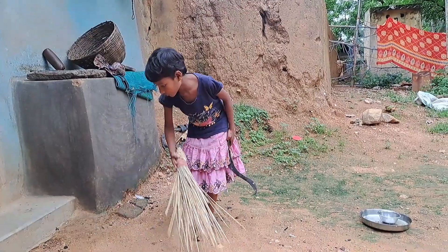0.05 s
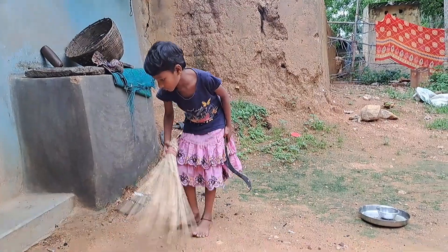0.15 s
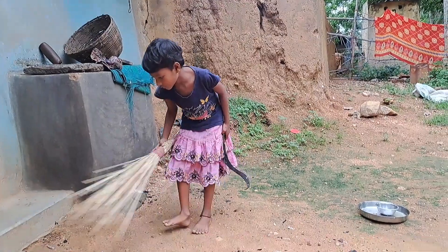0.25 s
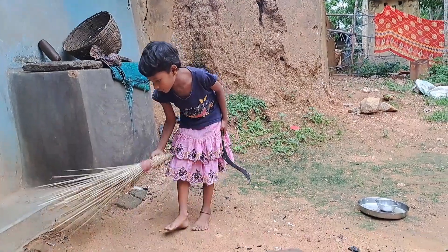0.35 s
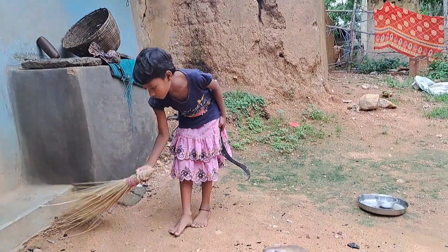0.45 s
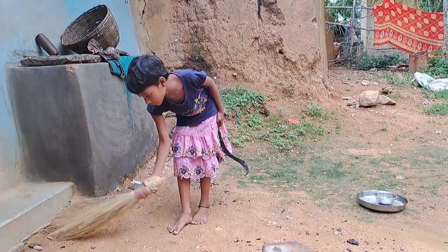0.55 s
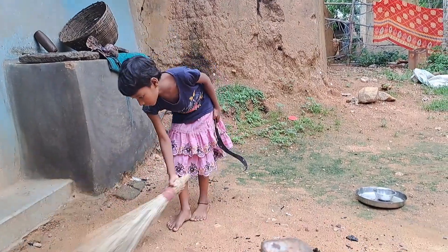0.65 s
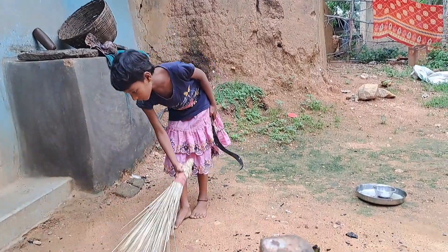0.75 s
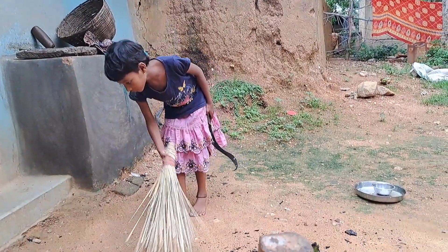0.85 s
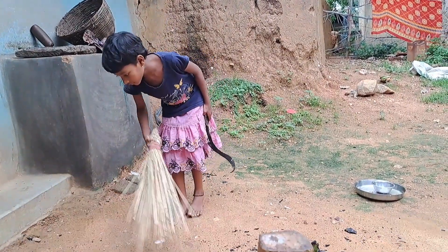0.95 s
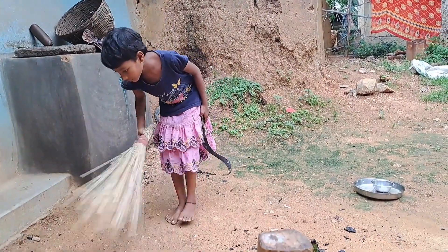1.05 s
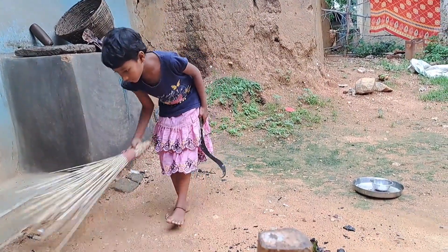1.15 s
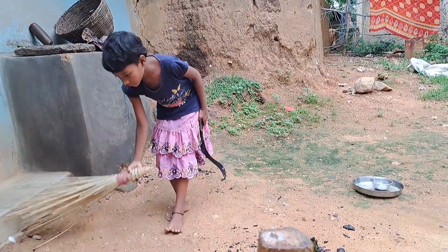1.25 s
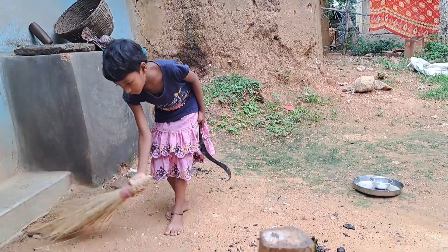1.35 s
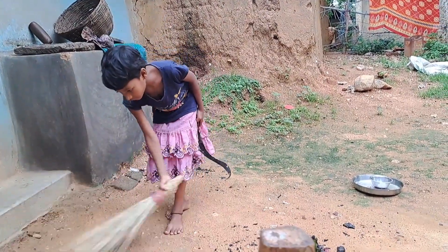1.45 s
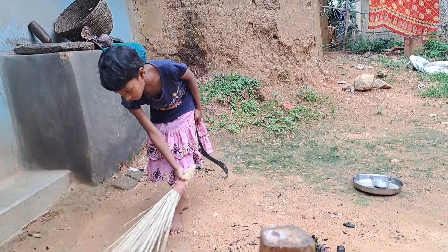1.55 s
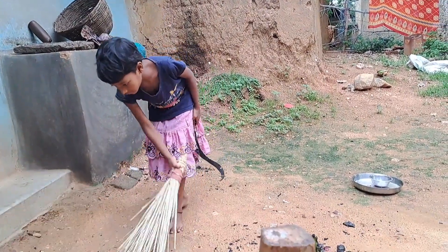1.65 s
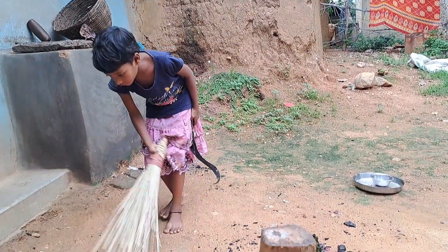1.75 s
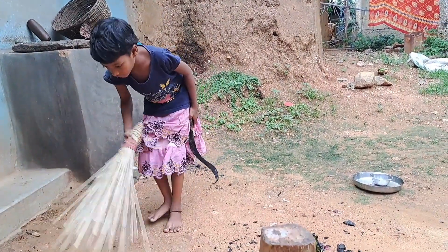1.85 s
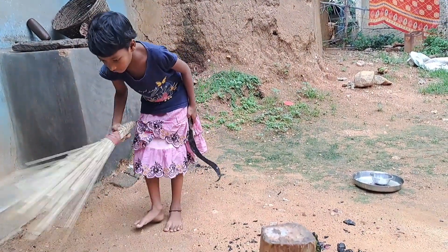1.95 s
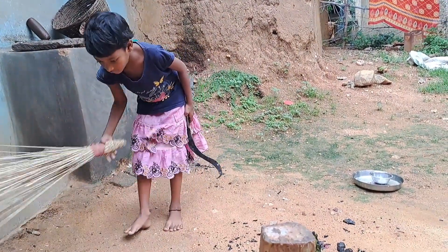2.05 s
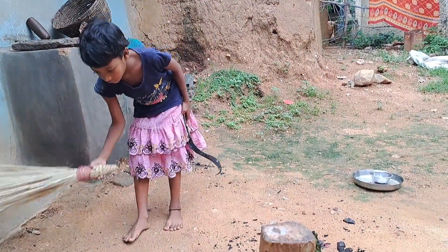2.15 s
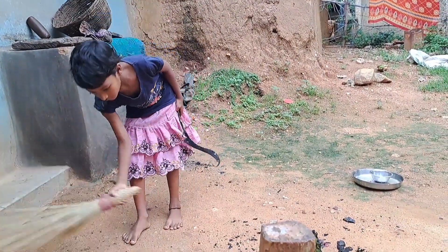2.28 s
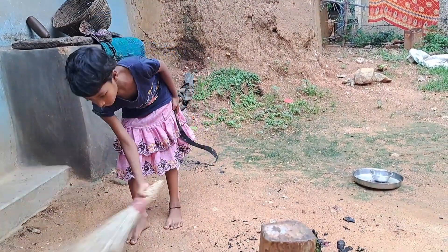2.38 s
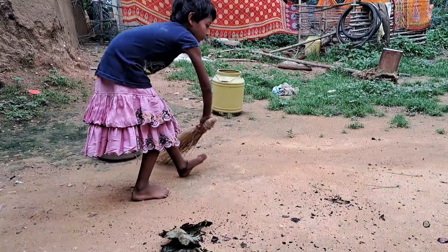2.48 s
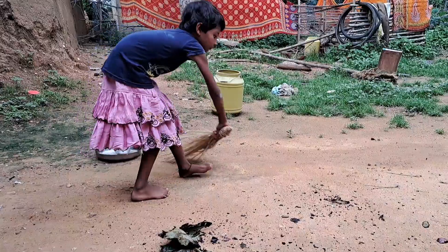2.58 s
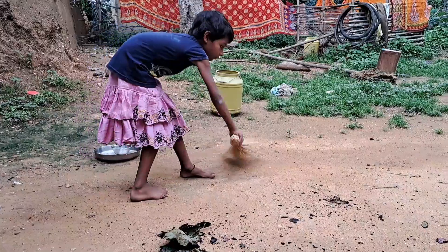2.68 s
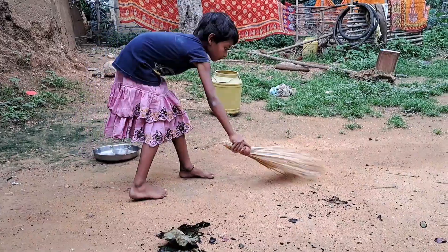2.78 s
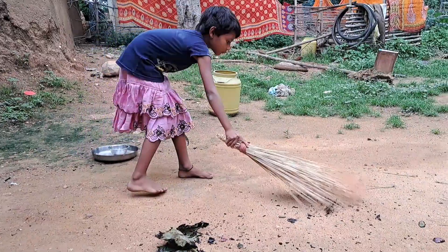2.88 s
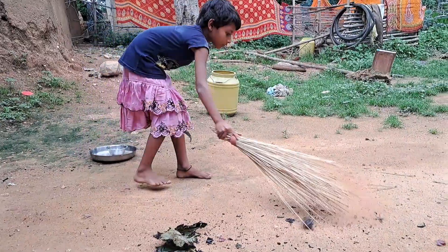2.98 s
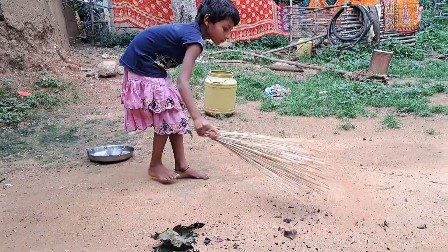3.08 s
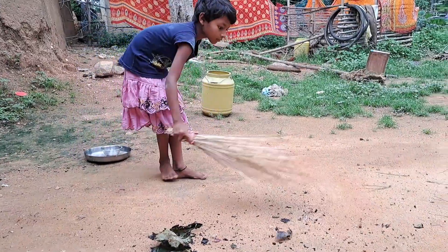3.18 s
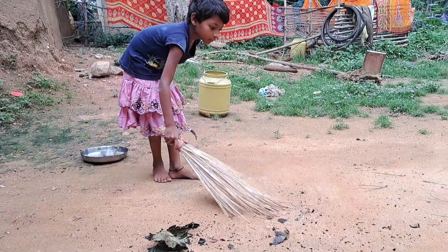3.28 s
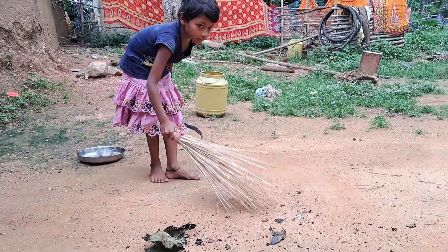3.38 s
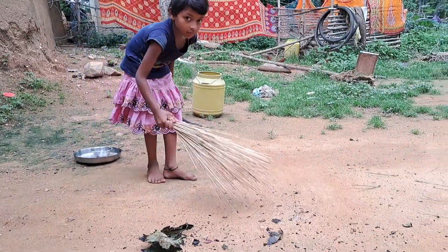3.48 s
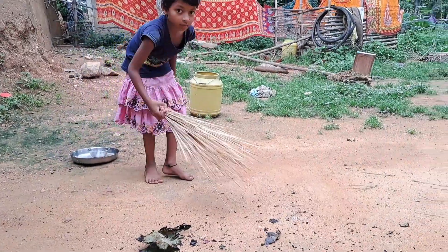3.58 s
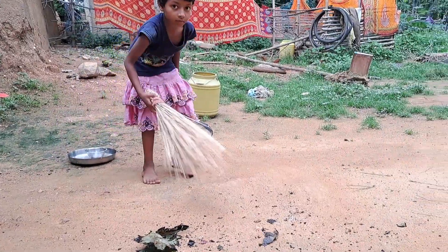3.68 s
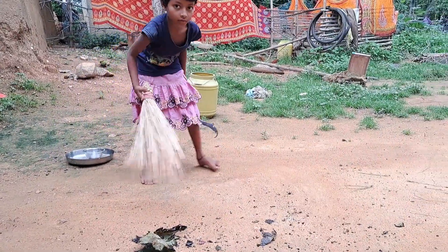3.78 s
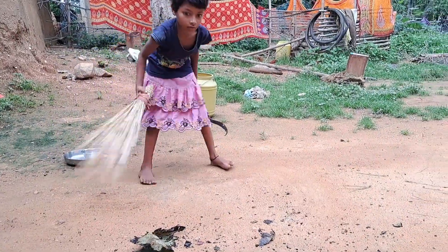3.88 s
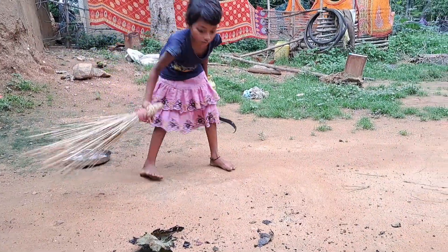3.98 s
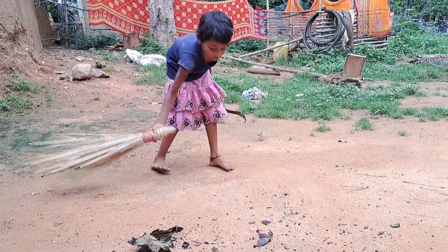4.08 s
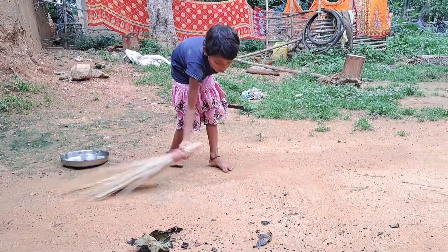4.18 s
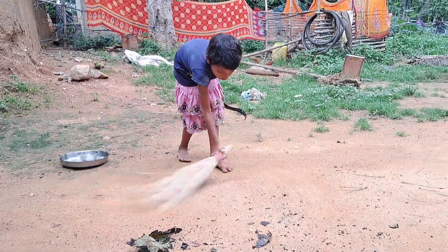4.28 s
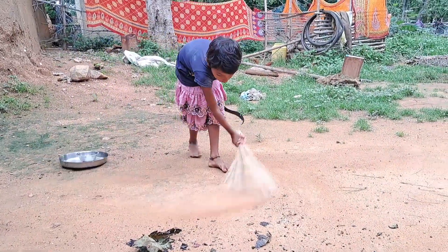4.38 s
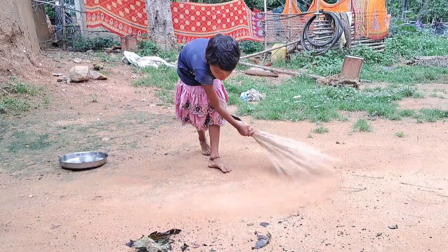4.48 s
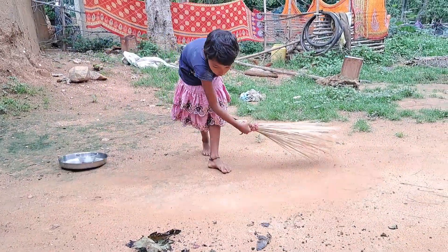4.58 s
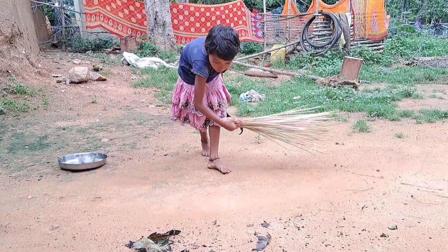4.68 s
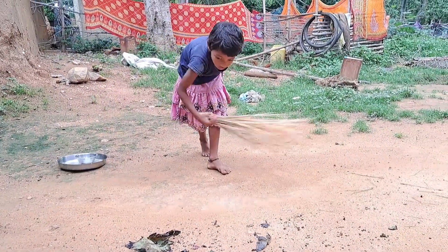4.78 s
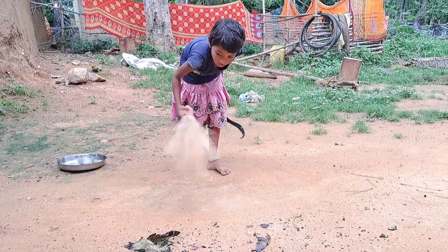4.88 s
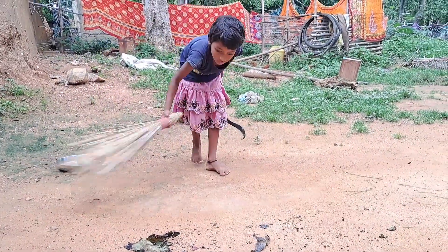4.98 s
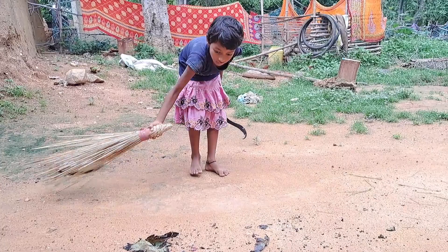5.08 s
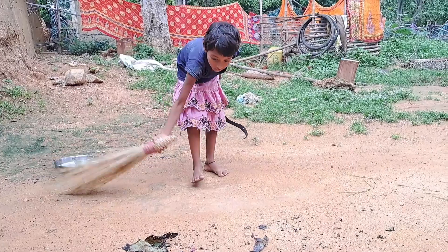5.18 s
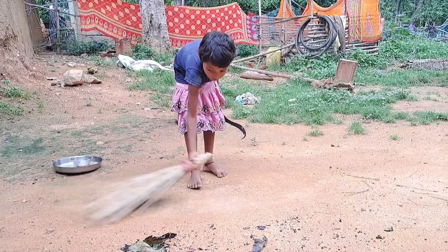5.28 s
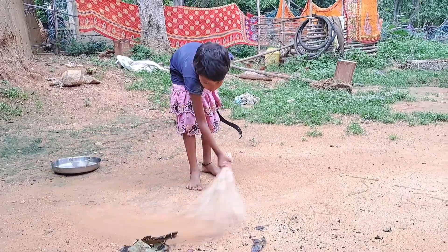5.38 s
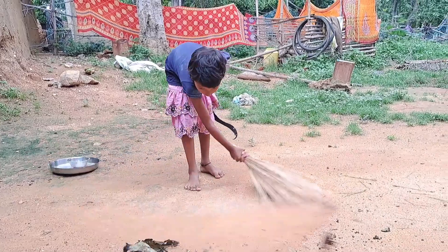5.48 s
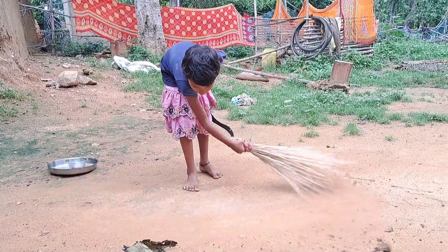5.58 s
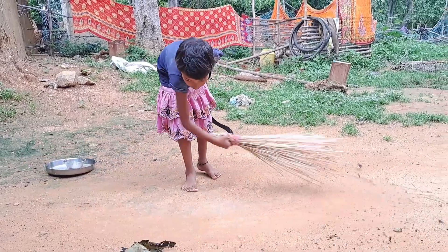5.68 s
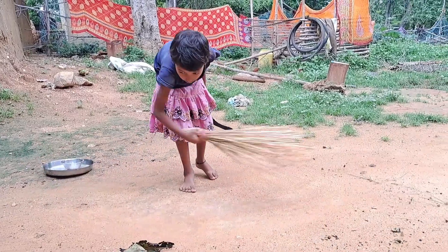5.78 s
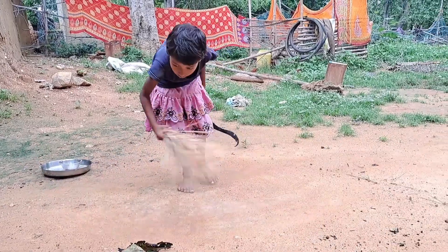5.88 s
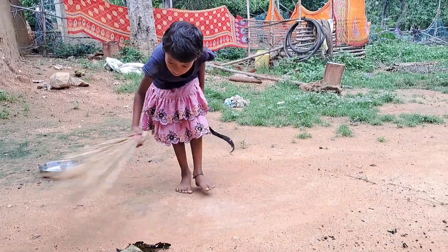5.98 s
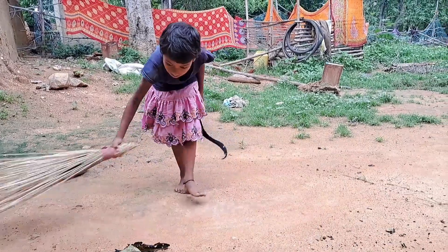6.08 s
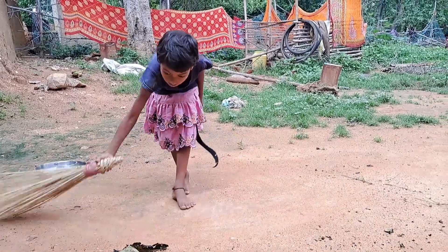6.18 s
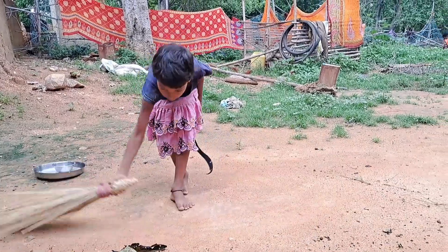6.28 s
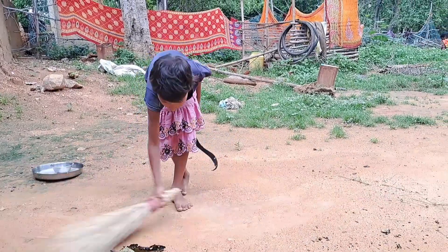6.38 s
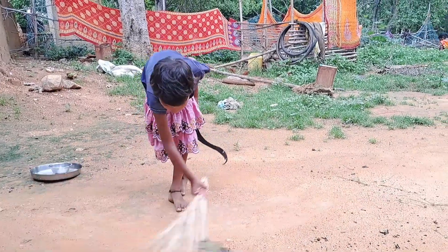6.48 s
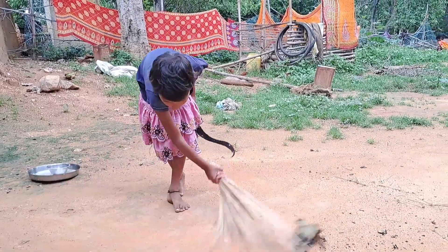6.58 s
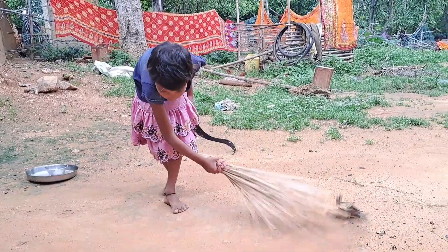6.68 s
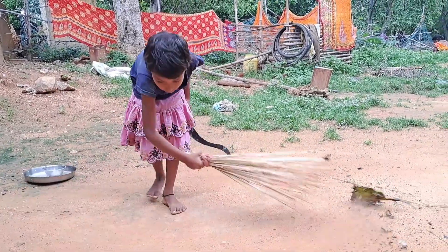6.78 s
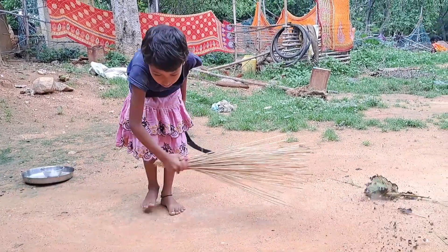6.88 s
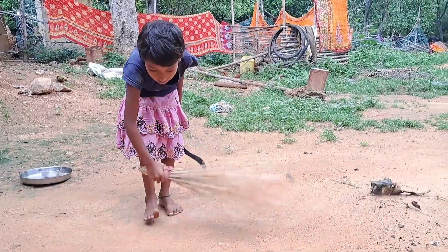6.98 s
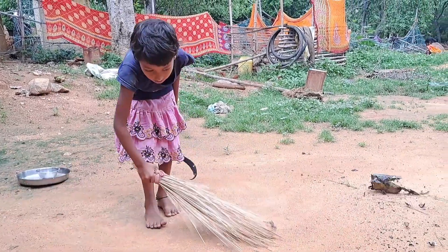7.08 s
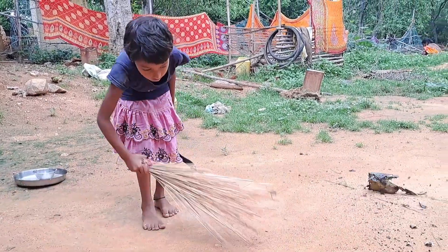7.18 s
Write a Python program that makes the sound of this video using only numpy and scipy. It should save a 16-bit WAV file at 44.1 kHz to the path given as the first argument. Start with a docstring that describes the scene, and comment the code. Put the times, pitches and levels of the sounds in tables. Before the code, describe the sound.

A stiff grass broom sweeps bare dirt in steady gritty swishes, with stalk ticks, one sharp bright click, and a clod tumbling near the end.

```python
"""A grass hand broom starts sweeping bare dirt beside a wall, stalks hissing and scratching over grit.
Single stalks tick and clods knock; from about 2 s a few faint far notes whistle or hiss.
Near 2.5 s the sound drops out briefly, then the strokes go on over open ground; late on, a swept clod tumbles.
Shaped noise makes the sweep, knocks, far rumble, wavering hum and air; smeared sines make the notes.
Two microphone ports hear it all, the left slightly earlier and the right louder."""
import sys
import numpy as np
from scipy import signal
from scipy.fft import rfft, irfft, next_fast_len
from scipy.io import wavfile
from scipy.ndimage import uniform_filter1d, map_coordinates

SR = 44100
rng = np.random.default_rng(int(sys.argv[2]) if len(sys.argv) > 2 else 0)


def materialize(psi):
    """Save the field psi as 16-bit PCM at rate SR to the path in sys.argv[1].

    A 1-D psi becomes a single channel; in a 2-D psi each row is a channel.
    """
    bounded = np.clip(np.atleast_2d(psi).T, -1, 1)
    quanta = np.round(bounded * 32767).astype(np.int16)
    wavfile.write(sys.argv[1], SR, quanta)


N = 319351  # samples


def amp(db):
    """Decibels to linear gain."""
    return 10 ** (np.asarray(db) / 20)


def unit(x):
    """Scale to an rms of 1."""
    return x / np.sqrt(np.mean(x ** 2) + 1e-20)


def along(points, hz):
    """Read (f/Hz, value) points along a log frequency axis."""
    f, v = np.transpose(points)
    return np.interp(np.log(hz + 1), np.log(f + 1), v)


def curves(rows):
    """Draw one automation curve for each column after the time."""
    s, *cols = np.transpose(rows)
    return [np.interp(np.arange(N) / SR, s, c) for c in cols]


def wobble(rate):
    """A smooth random curve with rate knots a second, fixed or one value per sample."""
    knots = np.cumsum(rate * np.ones(N)) / SR
    return map_coordinates(rng.standard_normal(N // 8), [knots], mode="wrap")


def filtered(x, response):
    """Shape the spectrum of x with a response of frequency."""
    m = next_fast_len(N + 8192)
    spectrum = rfft(x, m) * response(np.fft.rfftfreq(m, 1 / SR))
    return irfft(spectrum, m)[..., :N]


# How alike left and right sound: f/Hz, likeness (1 = the same)
LIKENESS = [(60, 0.71), (300, 0.92), (640, 0.24), (1200, 0.62), (2400, 0.067), (5000, 0.073), (12000, 0.04)]


def part(source, gain):
    """Colour two unrelated signals and mix them so the ports agree mostly in the bass; rms 1."""
    def mid_side(hz):
        turn = np.arccos(np.clip(along(LIKENESS, hz), -1, 1)) / 2
        return gain(hz) * np.array([np.cos(turn), np.sin(turn)])

    mid, side = filtered(source, mid_side)
    return unit(np.array([mid + side, mid - side]))


def noise_part(gain):
    """White noise shaped into a stereo layer."""
    return part(rng.standard_normal((2, N)), gain)


def effort():
    """How hard the broom is working, 0 to 1, from its smoothed pressure."""
    hiss_db = uniform_filter1d(curves(np.vstack(PRESSURE))[0], size=4000)
    return np.clip(1 + (hiss_db - FULL_DB) / 25, 0, 1)


# Yard between strokes, before swells: t/s, rumble level/dB, hum level/dB
YARD_LEVELS = [(0, -68.5, -76), (.9, -61.5, -70), (1.25, -64, -69), (1.5, -71.5, -84), (2.45, -69, -80),
               (3.1, -67.5, -70.5), (4.8, -70.5, -75), (6, -68, -73), (7.24, -65, -74.5)]
# Relative rumble spectrum: f/Hz, level/dB per Hz
RUMBLE_COLOUR = [(12, -38.5), (20, -2), (70, -2), (92, -4.5), (133, -7), (161, -8.5), (232, -1.5),
                 (281, -9.5), (900, -37.5), (1170, -70), (1980, -120)]
RUMBLE_SWELL_DB = 2  # at full pressure


def rumble():
    """Far rumble: deep coloured noise that wavers and swells with the strokes."""
    rumble_db, _ = curves(YARD_LEVELS)
    level_db = rumble_db + RUMBLE_SWELL_DB * effort() + 0.8 * wobble(4.3)
    return amp(level_db) * noise_part(lambda hz: amp(along(RUMBLE_COLOUR, hz)))


# Hum resonance: centre f/Hz, half width f/Hz (where the gain halves)
HUM_BAND = (128.6, 5)
HUM_SWELL_DB = 7.5  # at full pressure


def hum():
    """Wavering hum: noise in so narrow a resonance that it beats, swelling with the strokes."""
    centre, width = HUM_BAND
    _, hum_db = curves(YARD_LEVELS)
    band = noise_part(lambda hz: 1 / (1 + ((hz - centre) / width) ** 2))
    return amp(hum_db + HUM_SWELL_DB * effort()) * band


# Relative spectrum of far leaves and insects: f/Hz, level/dB per Hz
AIR_COLOUR = [(530, 1), (900, 1), (1520, -15), (2050, -21), (2130, -2.5), (2980, -19.5), (7300, 3),
              (9500, -12.5), (15700, 0)]
AIR_DB = -70.5  # mean level, before the waver


def air():
    """Far leaves and insects: a smooth, gently wavering coloured hiss."""
    return amp(AIR_DB + 0.69 * wobble(7.4)) * noise_part(lambda hz: amp(along(AIR_COLOUR, hz)))


# Far notes, the widest only a faint band of hiss:
# t/s, length/s, first f/Hz, held f/Hz, nominal level/dB, blur f/Hz, share of the note spent gliding
BIRD_NOTES = [(1.986, 0.041, 1360, 1400, -56, 60.5, .5), (3.39, 0.16, 4590, 5300, -49.5, 181, .55),
              (3.628, 0.44, 2320, 2320, -67.5, 600, 0.54), (4.016, 0.173, 2300, 2320, -57.5, 88.9, 1)]
SWELL, NOTE_EDGE_DB = 0.26, -12.5  # share of a note spent swelling; level at its ends


def bird(s, length, first_hz, held_hz, db, blur_hz, glide):
    """A soft far whistle glides to a held note; leaves and echoes smear it into a narrow band of noise."""
    u = (np.arange(N) / SR - s) / length  # 0 to 1 through the note
    bend = np.sin(np.pi / 2 * np.clip(u / glide, 0, 1)) ** 2
    hz = first_hz + (held_hz - first_hz) * bend
    swell = amp(db + np.interp(u, [0, SWELL, 1], [NOTE_EDGE_DB, 0, NOTE_EDGE_DB]))
    smear = 20 / blur_hz + wobble(blur_hz) + 1j * wobble(blur_hz)
    sounding = uniform_filter1d(1. * ((u > 0) & (u < 1)), size=500)
    whistle = np.real(np.exp(2j * np.pi * np.cumsum(hz) / SR) * smear)
    return sounding * swell * whistle


def taps(rows, width, rise, t60):
    """Short decaying noise bursts ring around each centre; width is a share of it, rise and t60 in s."""
    length = 4096
    out, t = np.zeros((2, N + length)), np.arange(length) / SR
    hz = np.fft.rfftfreq(length, 1 / SR)
    shape = (1 - np.exp(-t / rise)) * amp(-60 * t / t60)
    for s, db, centre in rows:
        damping = 1j * hz * centre * width
        ring = damping / (centre ** 2 - hz ** 2 + damping)
        # one noise common to both sides, plus one of its own for each
        noise = rng.standard_normal(length) + 0.6 * rng.standard_normal((2, length))
        burst = irfft(rfft(noise * shape) * ring ** 2)
        peak = np.sqrt(uniform_filter1d(np.mean(burst ** 2, axis=0), size=40).max())
        start = round(s * SR)
        out[:, start:start + length] += amp(db) * burst / peak
    return out[:, :N]


# The swept clod rolls and sheds crumbs: from t/s, to t/s, highest peak level/dB, middle f/Hz
TUMBLE_SPAN = (6.65, 7.2, -48, 902)
CRUMBS = 160


def crumbs():
    """Many small knocks at random times, levels and pitches while the clod rolls."""
    start, end, db, hz = TUMBLE_SPAN
    when, size, pitch = rng.random((CRUMBS, 3)).T
    return np.c_[start + (end - start) * when, db - 10 * size, hz * 4 ** (pitch - .5)]


# Clods and pebbles knock on the ground: t/s, peak level/dB, centre f/Hz
CLOD_KNOCKS = [(0.228, -46.5, 316), (0.524, -44, 684), (0.787, -43, 282), (2.424, -44, 308),
               (6.123, -59, 290), (6.521, -26.5, 1370), (6.583, -31, 1720), (6.697, -30.5, 1110),
               (6.771, -29.5, 1500), (6.834, -39.5, 1300), (6.913, -35.5, 600), (6.942, -40, 444),
               (6.974, -60, 400), (7.011, -44, 1000), (7.077, -39, 1020), (7.133, -40, 1290)]


def clods():
    """Clods, pebbles and shed crumbs knock on the dirt as short, damped bursts."""
    return taps([*CLOD_KNOCKS, *crumbs()], width=1.1, rise=.0005, t60=0.011)


# Single stalks snap back: t/s, peak level/dB, centre f/Hz
STALK_TICKS = [(0.16, -36, 4860), (0.3516, -42.5, 14000), (0.379, -51, 6190), (0.421, -51, 7060),
               (1.203, -50, 6000), (1.3057, -62, 6750), (1.3194, -42, 5300), (1.8652, -38, 5800),
               (2.198, -65, 6000), (2.5331, -47, 11500), (2.5535, -38, 12200), (2.6184, -34, 14500),
               (2.8453, -20.5, 14500), (3.0752, -32, 7160), (3.2, -47, 5260), (3.2779, -52, 5740),
               (3.337, -44, 12000), (3.373, -33, 13000), (4.202, -48, 7000), (5.183, -47.5, 8550),
               (5.238, -45, 7750), (6.088, -51, 7800)]


def ticks():
    """Single stalks snap back with short, mostly bright bursts."""
    return taps(STALK_TICKS, width=1.1, rise=.0004, t60=0.014)


def grit(spiky_db, patchy_db, size):
    """Dense scratches of uneven strength, size samples long, in patches where bunches of stalks catch."""
    strength = np.minimum(rng.exponential(size=N // size + 1), 4)
    strength = uniform_filter1d(np.repeat(strength, size)[:N], size=size)
    scratches = amp(spiky_db * strength) * rng.standard_normal((2, N))
    z = signal.stft(scratches, nperseg=256)[2]
    patches = uniform_filter1d(rng.standard_normal(z.shape[1:]), size=4, axis=0)  # smooth over frequency
    patches = uniform_filter1d(patches, size=9, axis=1)  # smooth over time
    return signal.istft(z * amp(patchy_db * unit(patches)), nperseg=256)[1][:, :N]


# Relative sweep spectra beside the wall and on open ground: f/Hz, level/dB per Hz
WALL_SWEEP = [(88, -53.5), (150, -29.5), (405, -27.5), (881, -17.5), (1230, -7), (1680, -3.5), (1850, -6),
              (2160, -2.5), (2780, -3), (5490, 4.5), (8760, -3), (12000, 2.5), (15700, 4.5)]
OPEN_SWEEP = [(88, -42), (150, -18.5), (302, -11.5), (473, -19.5), (521, -14), (1710, 4), (2570, -2),
              (5180, -2), (6290, -7), (7790, -2.5), (9650, -8), (12400, 0), (15700, -1)]
# How hard the broom bears on the ground, one list from each touchdown: t/s, hiss level/dB
PRESSURE = [
    [(0.0, -39.5), (0.154, -51), (0.16, -47), (0.21, -55.5), (0.356, -65.5), (0.372, -75), (0.378, -63.5),
     (0.458, -67.5), (0.47, -58)],
    [(0.473, -55.5), (0.515, -43), (0.665, -38.5), (0.723, -31.5), (0.861, -38), (0.965, -49.5),
     (1.101, -49), (1.295, -66), (1.316, -49.5)],
    [(1.32, -47.5), (1.534, -32.5), (1.632, -36), (1.804, -51), (1.88, -48), (1.902, -53), (2.098, -64.5),
     (2.164, -78), (2.196, -67)],
    [(2.2, -60.5), (2.246, -58.5), (2.292, -43.5), (2.318, -40), (2.366, -41.5), (2.43, -30.5),
     (2.443, -30)],
    [(2.48, -83.5), (2.572, -53.5), (2.662, -57.5), (2.744, -44), (2.94, -38), (3.192, -63.5),
     (3.202, -56.5), (3.224, -69.5), (3.33, -62.5)],
    [(3.335, -55), (3.347, -43.5), (3.385, -44.5), (3.499, -58), (3.527, -55), (3.583, -64.5),
     (3.711, -68.5), (3.785, -78.5), (3.93, -85)],
    [(3.935, -76), (3.989, -72.5), (3.993, -79), (4.015, -82), (4.033, -75), (4.057, -77), (4.069, -69.5),
     (4.127, -66.5), (4.16, -75)],
    [(4.165, -75.5), (4.215, -49), (4.365, -35.5), (4.601, -42.5), (4.745, -61), (4.921, -69.5),
     (4.963, -78), (5.115, -78), (5.232, -63.5)],
    [(5.237, -57.5), (5.291, -52), (5.357, -38), (5.481, -33.5), (5.709, -45), (5.775, -54.5), (6.049, -70),
     (6.067, -68.5), (6.083, -75)],
    [(6.088, -62), (6.11, -64), (6.174, -74), (6.176, -77), (6.218, -77), (6.224, -68), (6.236, -74)],
    [(6.241, -63), (6.295, -52.5), (6.327, -53), (6.485, -32.5), (6.567, -32.5), (6.907, -48.5),
     (6.953, -45.5), (6.997, -51.5), (7.11, -53.5)],
    [(7.113, -52), (7.119, -45.5), (7.159, -39.5), (7.171, -43.5), (7.24, -53.5)],
]
# Each stroke: touchdown t/s; scrape, sizzle and tips level/dB over the hiss, before the moves below;
# left-right level/dB; stalks fan out around t/s, spread t/s, brightening level/dB
STROKE_MIX = [(0, -6.5, -3.5, -5, 0.4, .05, 0.08, 3), (.473, -7.5, -1.5, -6, 0.73, .85, .12, 3),
              (1.32, -9, -1, -5, 0.67, 1.65, 0.11, 1.4), (2.2, -7, 0.5, -3, 0.2, 2.4, .1, 1),
              (2.48, -9.5, 0, 4, 0.8, 2.767, 0.13, 8.6), (3.335, -9.5, -2.5, -0.5, .5, 3.375, 0.029, 6.2),
              (3.935, -10, 0, -3, .5, 4.12, .05, 3.4), (4.165, -9, -1.5, -1, 0.78, 4.53, 0.14, 7.2),
              (5.237, -7, -3, -0.5, 1.2, 5.57, .12, 9.4), (6.088, 0, -0.5, -5, -2.6, 6.09, .03, 2),
              (6.241, -7, -5.5, 1, 0.65, 6.72, 0.2, 5), (7.113, -10, -7, 1, 1, 7.15, .05, 1)]
# Borders between scrape, hiss, sizzle and tips: f/Hz
BAND_BORDERS = [2494, 7400, 11260]
MOVE_S = 2.476  # from the wall to open ground
# swept grit trails the stalks and swings wider around full pressure
SCRAPE_LAG_S, SCRAPE_GROWS, FULL_DB = 0.019, 1.114, -36
THUD_HZ, THUD_DB, THUD_GROWS = 648, -11, 1.13  # the deepest scrape needs a firm stroke
SCRAPE_PILES_DB_PER_S = 5  # grit gathers ahead of the broom as a stroke goes on
FAN_SIZZLE, FAN_RIGHT = 0.6, 0.085  # share of the brightening in the sizzle and in a lean to the right


def strokes(colour):
    """Coarse grit scrapes low down, stalks scratch finely above; one pressure drives all bands."""
    t = np.arange(N) / SR
    s, hiss = np.vstack(PRESSURE).T
    hiss_db = np.interp(t, s, hiss)
    late_t = np.maximum(t - SCRAPE_LAG_S, MOVE_S * (t > MOVE_S))  # the lag never reaches back over the move
    late_db = np.interp(late_t, s, hiss)
    rows = np.array(STROKE_MIX)
    now = rows[np.searchsorted(rows[1:, 0], t)]
    down_s, scrape_db, sizzle_db, tips_db, lean_db, fan_s, fan_for_s, fan_db = now.T
    scrape_db = scrape_db + SCRAPE_PILES_DB_PER_S * (t - down_s)
    fan_db = fan_db * np.exp(-((t - fan_s) / fan_for_s) ** 2)
    levels = [
        FULL_DB + THUD_GROWS * (late_db - FULL_DB) + scrape_db + THUD_DB,  # thud
        FULL_DB + SCRAPE_GROWS * (late_db - FULL_DB) + scrape_db,  # scrape
        hiss_db,
        hiss_db + sizzle_db + FAN_SIZZLE * fan_db,  # sizzle
        hiss_db + tips_db + fan_db,  # tips
    ]
    coarse = grit(spiky_db=-0.5, patchy_db=3.0, size=110)
    fine = grit(spiky_db=1.33, patchy_db=1.5, size=12)

    def under(hz, edge):  # power share below a soft edge
        return 1 - 1 / (1 + (edge / (hz + 1)) ** 8)

    edges = [0, THUD_HZ, *BAND_BORDERS, SR]
    sweep = 0
    for low, high, db in zip(edges, edges[1:], levels):
        def band(hz):
            return amp(along(colour, hz)) * np.sqrt(np.abs(under(hz, high) - under(hz, low)))

        source = fine if low > THUD_HZ else coarse
        sweep = sweep + amp(db) * part(source, band)
    flutter_db = 0.7 * wobble(14) + 0.6 * wobble(90)  # uneven ground
    pan_db = (lean_db - FAN_RIGHT * fan_db) * np.array([[.5], [-.5]])
    return amp(flutter_db + pan_db) * sweep


def broom():
    """The broom's colour switches from the wall's to open ground's at the move."""
    beside_wall = np.arange(N) < MOVE_S * SR
    return np.where(beside_wall, strokes(WALL_SWEEP), strokes(OPEN_SWEEP))


# Left over right: f/Hz, level/dB
PORT_BALANCE = [(40, -4.5), (250, -3), (600, -2.5), (1200, -6.5), (2400, -4), (4400, -8), (9000, -9),
                (15000, -5)]
# The left port hears earlier, mostly above a corner: lead t/s, corner f/Hz
PORT_LEAD = (0.0002575, 530)


def ports(hz):
    """The microphone body shades the left port; standing apart, the two ports hear at different times."""
    lead_s, corner_hz = PORT_LEAD
    db = along(PORT_BALANCE, hz)
    lead = lead_s * hz ** 2 / (hz ** 2 + corner_hz ** 2)
    shift = np.exp(1j * np.pi * hz * lead)  # half the lead for each port
    return np.array([amp(db / 2) * shift, amp(-db / 2) / shift])


def scene():
    """Layer the yard, far notes, knocks, ticks and broom, then hear them at the two ports."""
    yard = rumble() + hum() + air()
    notes = sum(bird(*note) for note in BIRD_NOTES)
    return filtered(yard + notes + clods() + ticks() + broom(), ports)


# Brief gap between the two places: t/s, level/dB
GAP = [(2.443, 0), (2.451, -40), (2.463, -44), (2.47, -50), (2.477, -50), (2.479, 0)]
TOP_HZ = 16000  # band limit


def record(dry):
    """The sound drops out briefly between the two places; nothing passes above the band limit."""
    def edge(hz):
        return np.clip((TOP_HZ - hz) / 250, 0, 1) ** 2

    return filtered(dry * amp(curves(GAP)[0]), edge)


dry = scene()
out = record(dry)
materialize(out)
```